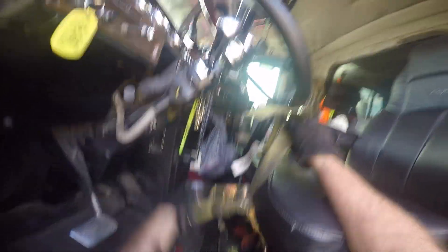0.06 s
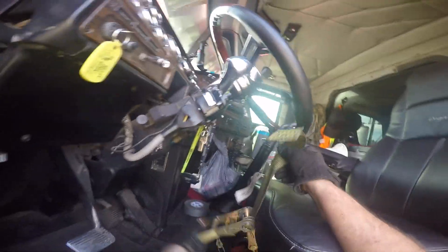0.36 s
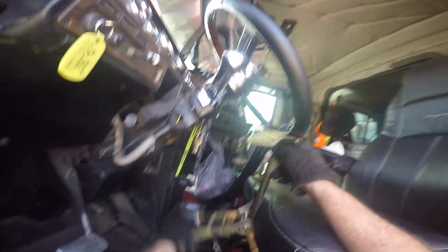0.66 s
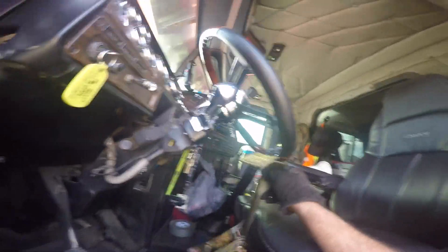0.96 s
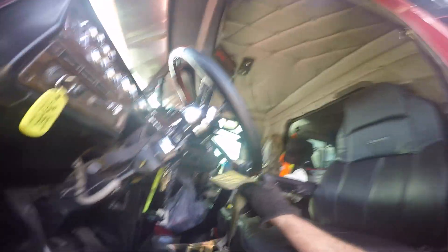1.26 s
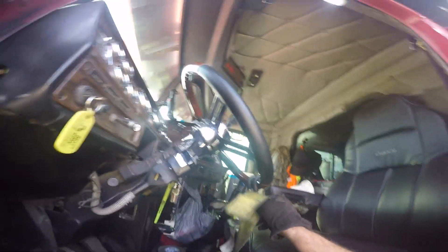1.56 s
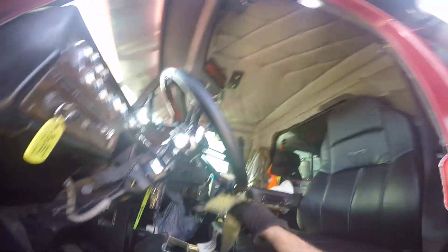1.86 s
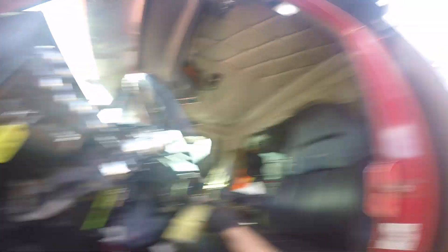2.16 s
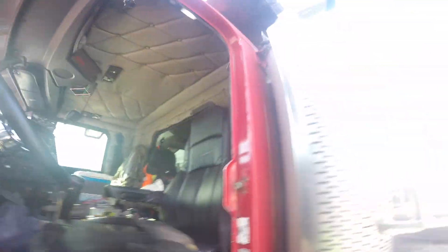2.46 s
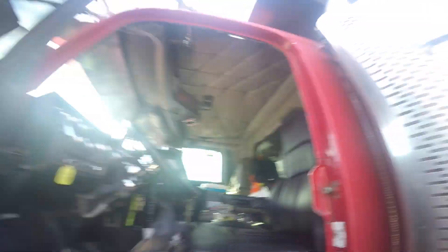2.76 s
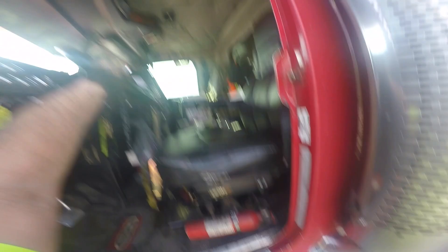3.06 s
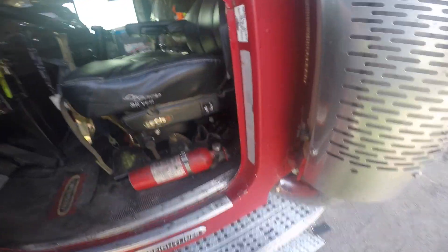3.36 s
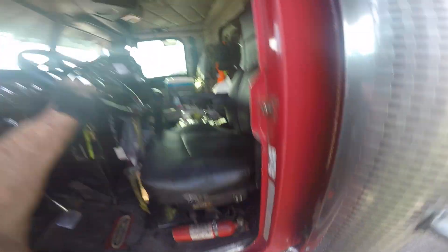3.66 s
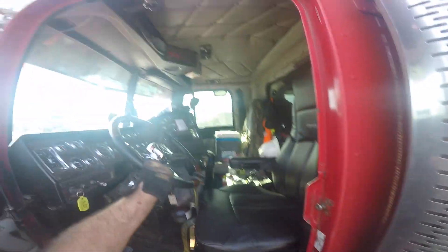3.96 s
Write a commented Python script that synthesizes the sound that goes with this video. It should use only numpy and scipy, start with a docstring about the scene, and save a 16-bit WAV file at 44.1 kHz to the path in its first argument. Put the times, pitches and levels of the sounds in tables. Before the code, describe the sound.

A cargo strap's steel buckle and hooks click, scrape and briefly squeak in a truck cab over a diesel idle. Duller clacks follow as the jostled body-worn microphone backs out the door and the engine clatter grows.

```python
"""A cargo strap's steel buckle and hooks click, scrape and squeak as gloved hands move it in a truck cab.
Knocks ring the steel's modes; webbing and steel slide; steel on steel sticks and slips.
A six-cylinder diesel idles throughout. The listener backs out of the open door, so cab boom gives way
to engine clatter. Duller clacks ring out, and the body-worn microphone is jostled."""
import sys
import numpy as np
from scipy import signal
from scipy.fft import rfft, irfft
from scipy.io import wavfile

SR = 44100
rng = np.random.default_rng(int(sys.argv[2]) if len(sys.argv) > 2 else 0)


def wav_record(signal):
    """Record a signal, one row per channel, as 16-bit PCM in the file named by sys.argv[1]."""
    frames = np.transpose(np.atleast_2d(signal))
    bounded = np.clip(frames, -1, 1)
    # unit amplitude maps onto the largest positive 16-bit level
    quanta = np.round(bounded * 32767).astype(np.int16)
    wavfile.write(sys.argv[1], SR, quanta)


N = 176400
T = np.arange(N) / SR

# buckle on hooks: start_s, low_gain_db, mid_gain_db, top_gain_db, tail_gain_db, ping_hz, ping_gain_db
KNOCKS = [(.086, -35.5, -36.5, -50, 1.5, 5760, -15), (0.1601, -24.5, -19, -21.5, 3.5, 3180, -0.5),
          (0.2227, -23, -17.5, -22.5, 0.5, 10400, -16), (0.33, -45, -49, -58, 3, 5330, -9),
          (0.4148, -37, -42, -50, 7, 11800, -12), (0.4254, -30.5, -18.5, -29.5, 0.5, 4900, -20),
          (0.4306, -19.5, -53, -34, -3.5, 3260, -20), (0.4923, -35, -31, -45, -9, 4200, -2),
          (0.5058, -27, -39, -39, 3, 4180, -3), (0.5185, -24.5, -18, -28, -8, 3130, 0.5),
          (0.539, -22, -24, -32.5, -7.5, 4200, -16), (0.6574, -43, -45.5, -55, 2.5, 5000, -9),
          (0.7651, -24, -25.5, -22.5, 4.5, 5330, 1.5), (0.8347, -24.5, -24, -26.5, 0.5, 7200, -13),
          (1.0566, -36, -30.5, -42, -5, 7350, -9), (1.073, -24.5, -24, -31, -6, 4400, 1.5),
          (1.081, -19.5, -18.5, -26, -5, 7260, -3.5), (1.363, -38, -34.5, -41.5, 4.5, 3410, 2),
          (1.505, -38, -39, -45, 2, 6400, -22), (1.5681, -35, -31, -39, 1, 3280, 4.5),
          (1.610, -28.5, -28, -40, -1.5, 7060, -13), (1.825, -39.5, -35, -44, 6.5, 7360, -15),
          (1.851, -25.5, -24.5, -31, 0, 7170, -6), (1.8639, -21.5, -23, -30, -4, 7240, 2),
          (2.053, -34, -43, -60, -6, 3320, -19), (2.2017, -22.5, -21.5, -20.5, 0.5, 3390, -6),
          (2.2958, -30, -26, -30, 5.5, 6110, 2)]
# steel modes: freq_hz, gain_db, t60_s
STEEL_MODES = [(2430, -15, 0.045), (3350, -19, 0.25), (3430, -2, 0.088), (4385, -5.5, 0.024),
               (4374, -6.5, 0.059), (5520, -23, 0.064), (6880, -4, 0.065), (6840, -23, 0.096),
               (9060, -19, 0.028), (10130, -5, 0.12), (11940, -5, .065), (13440, -8, .06),
               (14250, -3, 0.076)]
# dense upper modes; their dulling by the cab: freq_hz, gain_db
CRACK_SPECTRUM = [(300, -21.5), (1000, -18), (1700, -8.5), (3200, 2.5), (4800, -4), (7000, 1), (9200, -1),
                  (12000, 4), (14500, -6), (16000, -11)]
TAIL_SPECTRUM = [(1500, 3), (4000, 1), (8000, -4), (15000, -5.5)]
# webbing and steel slides: start_s, length_s, level_db
SCRAPES = [(0.083, 0.04, -41.5), (0.138, 0.037, -37.5), (0.682, 0.053, -43.5), (0.778, 0.07, -36),
           (1.346, 0.11, -42.5), (1.588, 0.055, -40), (2.069, 0.057, -43), (2.167, 0.051, -39.5),
           (2.209, 0.085, -39)]
# sliding friction: freq_hz, gain_db
SCRAPE_SPECTRUM = [(600, -26), (2200, 8.5), (3400, 9.5), (5000, 5.5), (7500, 1), (12000, -4), (15500, -19)]
# steel on steel: start_s, length_s, start_hz, end_hz, level_db, overtone_gain_db
SQUEAKS = [(0.121, 0.017, 2440, 2410, -37.5, -2), (.142, .02, 2550, 2380, -33.5, -17),
           (.695, 0.019, 1400, 1320, -40, -24), (.775, 0.037, 2400, 2150, -35, -22),
           (1.435, 0.026, 1380, 1470, -46.5, -14), (2.12, 0.113, 2000, 2230, -43, -24),
           (2.24, 0.046, 2380, 2550, -35.5, -5.5)]
# duller impacts: start_s, level_db, echo_level_db
CLACKS = [(2.804, -42.5, -52), (2.852, -27.5, -26.5), (3.701, -29.5, -33.5)]
# clack; its echo: freq_hz, gain_db
CLACK_SPECTRUM = [(500, -29), (1500, 0.5), (2300, -4.5), (3200, 9.5), (5000, -14), (7000, -6.5),
                  (10000, -7.5), (15000, -18)]
ECHO_SPECTRUM = [(500, -25), (1500, 3.5), (3100, 12.5), (4500, 3), (6000, -6.5), (10000, -29), (15000, -36)]
# listener position, 0 in the cab to 1 outside: time_s, outside_share
LISTENER_PATH = [(0, 0.046), (1.9, 0.11), (2.5, 0.37), (3.0, 0.9), (3.35, 1.0), (4, 0.62)]
# firing orders 1 to 3: rms_db
FIRING_ORDERS = [-27.5, -41.5, -52]
# lines from uneven cylinders, in the cab: freq_hz, line_rms_db
CAB_BOOM = [(110, -82), (145, -61.5), (163, -59.5), (185, -60), (198, -64), (212, -71), (260, -73),
            (291, -54), (305, -78.5), (326, -64), (360, -85.5), (500, -81), (560, -76.5), (620, -96.5)]
# engine clatter in the cab; at the door: freq_hz, gain_db
CAB_SPECTRUM = [(220, -33), (380, -11), (494, -7.5), (567, -4), (725, -19), (795, -6), (872, -12.5),
                (1000, -3.5), (1170, -10.5), (1240, -12.5), (1640, -8.5), (1970, -3.5), (2330, -17),
                (2760, -5), (3220, -9.5), (3480, -3), (3760, -22.5), (5190, -24), (5610, -22), (5960, -24),
                (6440, -25), (7510, -38), (11900, -36), (13100, -34), (15000, -60)]
DOOR_SPECTRUM = [(140, -36), (230, -8), (298, -28), (324, -14.5), (450, -15.5), (572, 1.5), (645, -10.5),
                 (753, -12.5), (1160, -6.5), (1420, -15.5), (1520, -9.5), (1940, -10.5), (2340, -14.5),
                 (2640, -12), (2830, -13.5), (3360, -12.5), (3790, -19.5), (4500, -24), (5350, -30),
                 (7040, -31), (8800, -43), (11200, -40), (12200, -48), (13100, -37), (14000, -62)]
# exhaust rumble, fully outside: freq_hz, density_db
EXHAUST_SPECTRUM = [(30, -74), (50, -48), (85, -57.5), (115, -69.5), (200, -75), (800, -150)]
# engine accessories, fully outside: freq_hz, width_hz, rms_db
ACCESSORY_HUMS = [(163, 7, -51.5), (574, 8, -58.5), (1170, 12, -58), (1972, 23, -52.5), (3400, 47, -54.5)]
# microphone jostles: centre_s, length_s, level_db
JOLTS = [(1.054, 0.062, -11), (1.25, 0.077, -10), (1.631, 0.15, -12), (2.773, 0.088, -17.5),
         (2.967, 0.072, -10), (3.067, 0.085, -18.5), (3.313, 0.05, -12), (3.476, 0.074, -8),
         (3.608, 0.1, -7.5)]
# microphone rumble: freq_hz, gain_db
RUMBLE_SPECTRUM = [(6, -43), (11, -40.5), (22, -38.5), (32, -36), (45, -52.5), (60, -54), (90, -61),
                   (130, -74), (220, -79.5), (330, -71), (500, -100), (1500, -150)]
# microphone self-noise: freq_hz, density_db
HISS_SPECTRUM = [(4000, -125), (9000, -113), (15000, -115)]
# electrical whine: freq_hz, rms_db
WHINE_TONES = [(6309, -72.5), (12618, -69)]


def buckle():
    """Each knock: a snap, a tail of cab reflections, the steel's modes and one ping of its own."""
    out, t = np.zeros(N), T[:SR // 4]
    snap_s, tail_rise_s, tail_hold_s = 0.0042, 0.0066, 0.0051
    mode_hz, mode_db, mode_t60_s = np.transpose(STEEL_MODES)[:, :, None]
    snap_env = np.exp(-t / snap_s)
    tail_env = (1 - np.exp(-t / tail_rise_s)) * decay(t - tail_hold_s, t60_s=0.084)
    for start_s, low_db, mid_db, top_db, tail_db, ping_hz, ping_db in KNOCKS:
        tone = [(3300, low_db), (7000, mid_db), (11500, top_db)]
        ticks = rng.standard_normal(len(t)) * np.exp(rng.standard_normal(len(t)))
        ticks = colour(ripple(ticks, spread_db=3.2), CRACK_SPECTRUM)
        ticks = colour(rms_one(ticks), tone)
        tail = from_db(tail_db) * colour(ticks, TAIL_SPECTRUM) * tail_env
        scatter_db = 2.55 * rng.standard_normal(mode_hz.shape)
        mode_gain = from_db(mode_db - 6 + np.interp(mode_hz, *np.transpose(tone)) + scatter_db)
        modes = np.sin(2 * np.pi * (mode_hz * t + rng.random(mode_hz.shape)))
        ring = np.sum(mode_gain * decay(t, mode_t60_s) * modes, axis=0)
        ping_gain = from_db(ping_db + np.interp(ping_hz, *np.transpose(tone)))
        ping = ping_gain * decay(t, t60_s=0.057) * np.sin(2 * np.pi * ping_hz * t)
        add(out, start_s, from_db(2) * (ticks * snap_env + tail + ring + ping))
    return out


def frame_thud(start_s=1.078, pitch_hz=424, level_db=-40):
    """One faint, hollow thud: a damped low mode of the buckle's frame."""
    out, t = np.zeros(N), T[:SR // 4]
    add(out, start_s, from_db(level_db) * decay(t, t60_s=0.1) * np.sin(2 * np.pi * pitch_hz * t))
    return out


def scrapes(catches_per_s=400, spread_db=2, hiss_gain_db=-6):
    """Sliding webbing and steel: runs of tiny catches over a hiss."""
    catches = (rng.random(N) < catches_per_s / SR) * from_db(spread_db * rng.standard_normal(N))
    ticking = rms_one(signal.fftconvolve(catches, decay(T[:SR // 20], t60_s=0.041))[:N])
    friction = rms_one(noise(SCRAPE_SPECTRUM) * (ticking + from_db(hiss_gain_db)))
    strokes = np.zeros(N)
    for start_s, length_s, level_db in SCRAPES:
        _, env = swell(length_s)
        add(strokes, start_s, from_db(level_db) * env)
    return strokes * friction


def squeaks():
    """Steel stick-slip: wavering glides with an octave and a fifth."""
    out, jitter = np.zeros(N), 1 + 0.009 * drift(rate_hz=360)
    for start_s, length_s, start_hz, end_hz, level_db, overtone_db in SQUEAKS:
        t, env = swell(length_s)
        glide_hz = start_hz + (end_hz - start_hz) * t / length_s
        phase = 2 * np.pi * np.cumsum(glide_hz * jitter[int(start_s * SR):][:len(t)]) / SR
        overtones = np.sin(2 * phase) + from_db(-3) * np.sin(1.5 * phase)
        add(out, start_s, from_db(level_db) * env * (np.sin(phase) + from_db(overtone_db) * overtones))
    return out


def clacks(echo_rise_s=0.01):
    """A short crack, then a duller, slower echo."""
    out, t = np.zeros(N), T[:SR // 2]
    crack_env = decay(t, t60_s=0.2)
    echo_env = decay(t, t60_s=0.49) * (1 - np.exp(-t / echo_rise_s))
    for start_s, level_db, echo_db in CLACKS:
        crack = rms_one(ripple(noise(CLACK_SPECTRUM, len(t)), spread_db=4))
        echo = rms_one(ripple(noise(ECHO_SPECTRUM, len(t)), spread_db=4))
        add(out, start_s, from_db(level_db) * crack * crack_env + from_db(echo_db) * echo * echo_env)
    return out


def diesel(outside, firing_hz=35.08, boom_outside_db=-4.5, pulse_depth=0.12):
    """Firing orders, boom lines at sixths of the firing rate, and noise pulsing with each firing."""
    phase = 2 * np.pi * np.cumsum(firing_hz * (1 + 0.002 * drift(rate_hz=1.6))) / SR

    def line(order, rms_db):
        return np.sqrt(2) * from_db(rms_db) * np.sin(order * phase + 2 * np.pi * rng.random())

    throb = sum(line(order, rms_db) for order, rms_db in enumerate(FIRING_ORDERS, 1))
    boom_orders = np.arange(19, 106) / 6
    boom = sum(line(order, np.interp(order * firing_hz, *np.transpose(CAB_BOOM))) for order in boom_orders)
    cab_clatter = from_db(-46.5) * np.sqrt(1 - outside) * rms_one(noise(CAB_SPECTRUM))
    door_clatter = from_db(-40.5) * np.sqrt(outside) * rms_one(noise(DOOR_SPECTRUM))
    exhaust = outside ** 2 * noise(EXHAUST_SPECTRUM)
    pulsing = (cab_clatter + door_clatter + exhaust) * (1 + pulse_depth * np.cos(phase))
    return throb + boom * from_db(boom_outside_db * outside) + pulsing


def accessories(outside):
    """Narrow, unsteady hums, growing toward the door."""
    out = np.zeros(N)
    for freq_hz, width_hz, rms_db in ACCESSORY_HUMS:
        phase = 2 * np.pi * freq_hz * T
        out += from_db(rms_db) * (drift(width_hz) * np.sin(phase) + drift(width_hz) * np.cos(phase))
    return outside * out


def microphone(outside, jolt_hz=29.3):
    """Low rumble, faint hiss, soft jolts and a thin electrical whine."""
    rumble_gain_db = -6 + outside
    out = noise(RUMBLE_SPECTRUM) * from_db(rumble_gain_db) + noise(HISS_SPECTRUM)
    for centre_s, length_s, level_db in JOLTS:
        t, env = swell(length_s)
        wobble = np.sin(2 * np.pi * (jolt_hz * t + rng.random()))
        add(out, centre_s - length_s / 2, from_db(level_db) * env ** 2 * wobble)
    whine = sum(np.sqrt(2) * from_db(db) * np.sin(2 * np.pi * hz * T) for hz, db in WHINE_TONES)
    return out + whine


def from_db(db):
    """Decibels to gain."""
    return 10 ** (np.asarray(db) / 20)


def rms_one(x):
    """Scale to unit rms."""
    return x / np.sqrt(np.mean(x ** 2) + 1e-20)


def colour(x, spectrum):
    """Filter by (freq_hz, gain_db) points."""
    freq_hz, gain_db = np.transpose(spectrum)
    bins_hz = np.maximum(np.fft.rfftfreq(len(x), 1 / SR), 1)
    return irfft(rfft(x) * from_db(np.interp(np.log(bins_hz), np.log(freq_hz), gain_db)), len(x))


def ripple(x, spread_db, step_hz=170.5):
    """Random peaks and dips, as from many close resonances."""
    grid_hz = step_hz * np.arange(1, 121)
    return colour(x, np.column_stack([grid_hz, spread_db * rng.standard_normal(len(grid_hz))]))


def noise(spectrum, size=N):
    """Noise from (freq_hz, density_db) points; density per hertz."""
    return colour(rng.standard_normal(size), spectrum) * np.sqrt(SR / 2)


def drift(rate_hz):
    """Smooth random wander, unit rms."""
    bins_hz = np.fft.rfftfreq(N, 1 / SR)
    return rms_one(irfft(rfft(rng.standard_normal(N)) / (1 + (bins_hz / rate_hz) ** 2), N))


def decay(t, t60_s):
    """Exponential decay; 1 before t = 0."""
    return np.exp(-np.log(1000) * np.maximum(t, 0) / t60_s)


def swell(length_s):
    """Time axis and half-sine envelope."""
    t = T[:int(length_s * SR)]
    return t, np.sin(np.pi * t / length_s)


def add(out, start_s, x):
    """Mix x into out at start_s."""
    i = max(int(start_s * SR), 0)
    out[i:i + len(x)] += x[:N - i]


def scene():
    """Strap hardware over the idling truck, mono."""
    outside = np.clip(np.interp(T, *np.transpose(LISTENER_PATH)), 0, 1)
    foreground = buckle() + frame_thud() + clacks() + scrapes() + squeaks()
    return (foreground + diesel(outside) + accessories(outside) + microphone(outside))[None]


def record(dry):
    """Steep low-pass."""
    cutoff_hz = 15400
    return signal.sosfilt(signal.ellip(10, .2, 90, cutoff_hz, fs=SR, output="sos"), dry)


dry = scene()
out = record(dry)
wav_record(out)
```